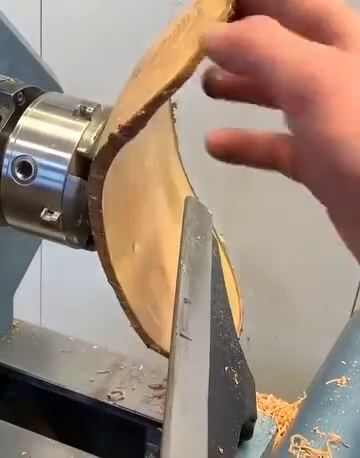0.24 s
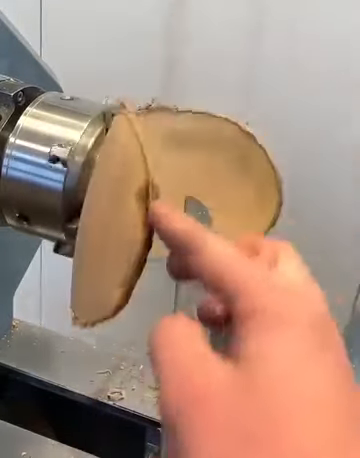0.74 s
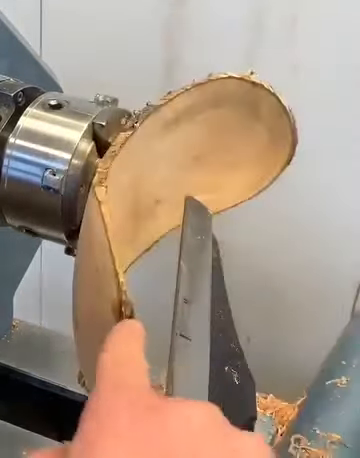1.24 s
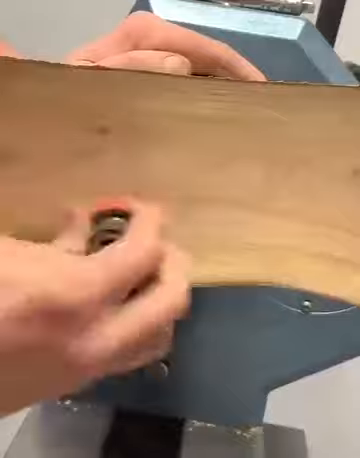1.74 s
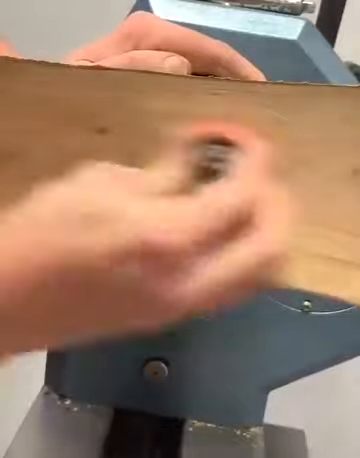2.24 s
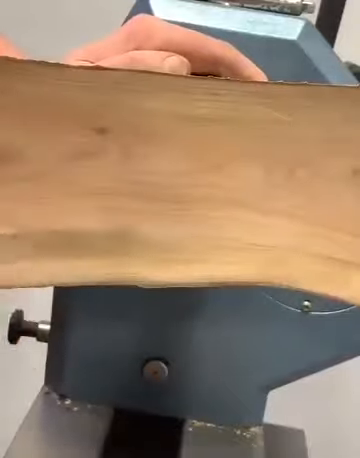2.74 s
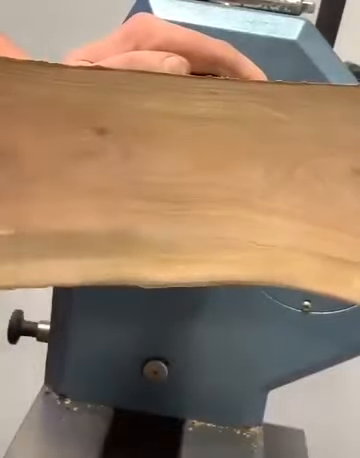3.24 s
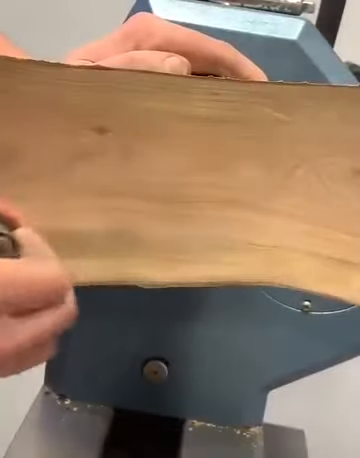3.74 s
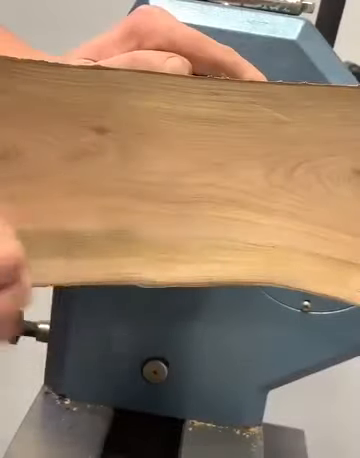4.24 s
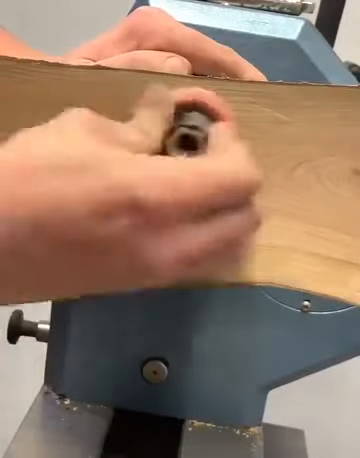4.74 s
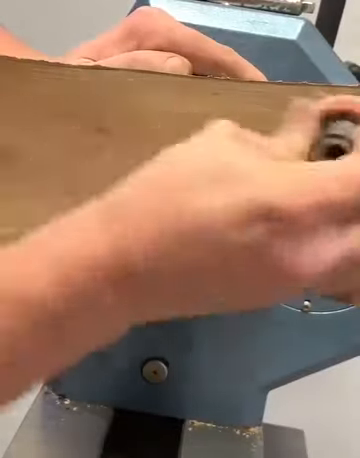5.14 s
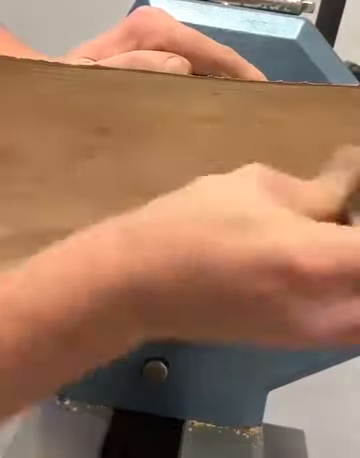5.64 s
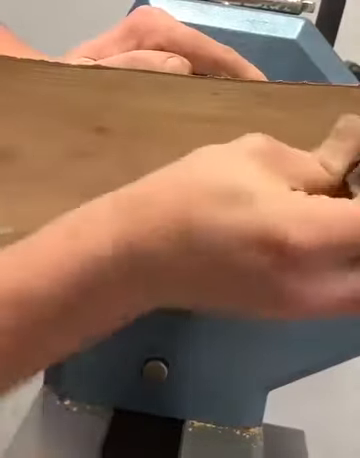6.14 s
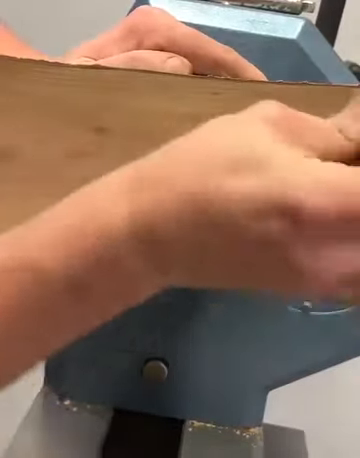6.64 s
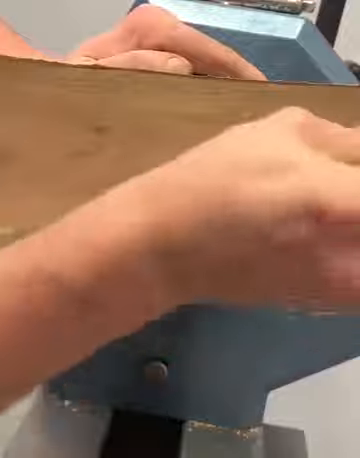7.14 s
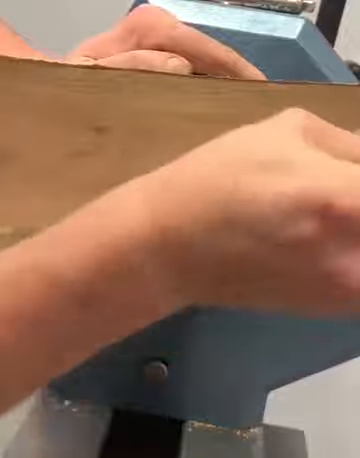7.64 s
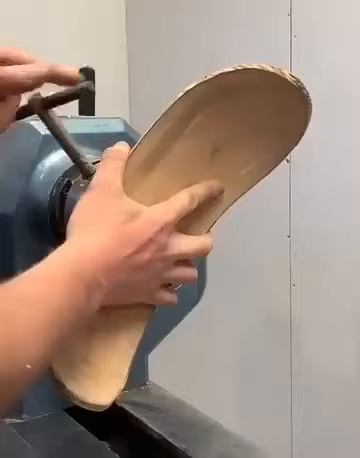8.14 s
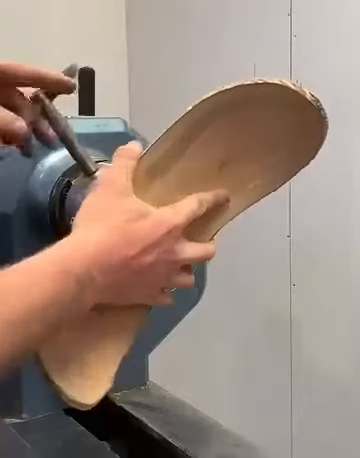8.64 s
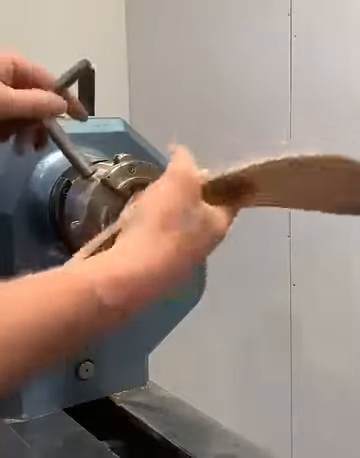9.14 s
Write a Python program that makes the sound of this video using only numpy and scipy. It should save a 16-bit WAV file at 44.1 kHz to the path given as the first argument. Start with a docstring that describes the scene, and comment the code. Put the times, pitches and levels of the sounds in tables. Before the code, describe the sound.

Fast, dry sanding of a hollow wooden piece in a small workshop, scratchy strokes and dull knocks, fading to faint rubs and hand rustle.

```python
"""A hand pad of abrasive is rubbed to and fro over a thin wooden bowl held in a lathe chuck, in a workshop.
Each stroke is grainy noise rasping through the shell's dense resonances, which shift as the pad moves, with a
fine hiss, a hum of the shell and a drone of the lathe bed. The pad lands with soft taps: noise ticks and damped
thuds. The heavy lathe is bumped as the work starts and stops, a damped low swing, and its frame rumbles under
the push as resonant noise. Hands rustle near the end, over a faint background and a short answer from the walls."""
import sys
import numpy as np
from scipy import signal
from scipy.fft import rfft, irfft, next_fast_len
from scipy.io import wavfile
from scipy.ndimage import uniform_filter1d, map_coordinates

SR = 44100
rng = np.random.default_rng(int(sys.argv[2]) if len(sys.argv) > 2 else 0)


def to_wav(sig):
    """Store sig (one row per channel, or 1-D mono) as 16-bit WAV at the path in sys.argv[1].

    Samples outside -1..1 are clipped; the rate is SR.
    """
    pcm = np.clip(np.atleast_2d(sig), -1, 1) * 32767
    pcm = np.round(pcm).astype(np.int16)
    wavfile.write(sys.argv[1], SR, pcm.T)  # frames by channels


N = 414099  # length [samples]
# All levels stand before the slight left-right balance in scene().


def amp(db):
    """The decibel law: level to amplitude ratio."""
    return 10 ** (np.asarray(db) / 20)


def unit(x):
    """Normalisation to a root-mean-square of 1."""
    return x / np.sqrt(np.mean(np.abs(x) ** 2) + 1e-20)


def along(points, hz):
    """Linear interpolation of (frequency, value) points on a logarithmic frequency axis."""
    f, v = np.transpose(points)
    return np.interp(np.log(hz + 1), np.log(f + 1), v)


def curves(rows):
    """Linear interpolation in time: one value per sample for each column after the time."""
    times, *columns = np.transpose(rows)
    return [np.interp(np.arange(N) / SR, times, column) for column in columns]


def wobble(rate):
    """Random modulation: a smooth curve through rate random knots a second."""
    knots = rng.standard_normal(int(N * rate / SR) + 4)
    return map_coordinates(knots, [np.arange(N) * rate / SR])


def filtered(x, response):
    """Linear filtering: the spectrum times a response of frequency."""
    m = next_fast_len(N + SR // 2)
    return irfft(rfft(x, m) * response(np.fft.rfftfreq(m, 1 / SR)), m)[..., :N]


def modes(table):
    """Modal superposition: damped resonances of alternating sign are summed."""
    def response(f):
        total = 0
        for k, (centre, width, db) in enumerate(table):
            resonance = 1j * f * width / (centre * centre - f * f + 1j * f * width)
            total = total + (-1) ** k * amp(db) * resonance
        return total
    return response


# Likeness of the left and right channels: (frequency [Hz], likeness [0-1])
LIKENESS = [(60, 1), (120, 0.91), (240, 0.81), (480, 0.8), (950, 0.47), (1890, 0.76), (3400, 0),
            (8150, 0.05), (8350, 0.03), (9300, 0.9), (10300, 0)]


def side_angle(hz):
    """Interchannel coherence: the angle from middle to side that yields the likeness."""
    return np.arccos(np.clip(along(LIKENESS, hz), 0, 1)) / 2


def spread(gain):
    """Diffuse field: stereo noise of rms 1, its left-right likeness set at each frequency."""
    def split(hz):
        return gain(hz) * [np.cos(side_angle(hz)), np.sin(side_angle(hz))]
    mid, side = filtered(rng.standard_normal((2, N)), split)
    return unit(np.array([mid + side, mid - side]))


# Relative spectrum of the workshop's background: (frequency [Hz], spectral level [dB])
AIR_SPECTRUM = [(59, -45), (100, -8), (267, -1.5), (644, -5.5), (1150, -13), (1980, -9.5), (2320, -16),
                (3610, -15.5), (7880, -25), (12000, -89)]


def background():
    """Stationary broadband noise: a faint hush whose level wavers slightly."""
    return amp(-54.5 + 1.5 * wobble(5.8)) * spread(lambda hz: amp(along(AIR_SPECTRUM, hz)))


def workshop(x):
    """Reverberation: convolution with decaying noise, a short diffuse answer from the walls."""
    t = np.arange(SR // 4) / SR
    tail = rng.standard_normal((2, len(t))) * amp(-60 * t / 0.14)  # t60 of 0.14 s
    return signal.fftconvolve(x, tail / np.linalg.norm(tail[0]), axes=1)[:, :N]


# Rumble of the lathe frame: (time [s], level [dB])
FRAME_RUMBLE = [(0.0, -44.5), (0.63, -67), (1.72, -55), (1.93, -47), (2.22, -53), (2.54, -61), (3.68, -58),
                (4.81, -54), (5.54, -63.5), (5.7, -50.5), (6.2, -48), (6.4, -55), (7.29, -59), (8.32, -55)]
# Resonances of the frame: (centre [Hz], width [Hz], relative level [dB])
FRAME_MODES = [(50, 12, 4), (67, 33, 1)]


def lathe():
    """Forced resonance: noise through the frame's low modes rumbles in lumps."""
    return amp(curves(FRAME_RUMBLE)[0] + 1.1 * wobble(9)) * spread(modes(FRAME_MODES))


# Rustle of hands on the bowl: (time [s], level [dB])
HAND_RUSTLE = [(8.92, -62), (8.99, -44), (9.13, -63), (9.24, -57), (9.28, -52.5), (9.39, -57)]


def handling():
    """Friction noise: hands shift on the loosened bowl with a soft, lumpy rustle."""
    lumps = amp(curves(HAND_RUSTLE)[0] + 3.5 * wobble(45))
    rustle = lumps * spread(lambda hz: modes([(450, 900, 0)])(hz) ** 2)
    return rustle * (np.arange(N) > HAND_RUSTLE[0][0] * SR)


def knocks(table, attack_s, lumpy_db):
    """Impulse response of a damped oscillator: each soft blow is a low swing that dies exponentially."""
    out, t = np.zeros(N + SR), np.arange(SR // 2) / SR
    for s, db, hz, t60 in table:
        decay_db = -60 * t / t60
        overtone = 0.49 * np.sin(2 * np.pi * 1.79 * hz * t) * amp(decay_db)  # dies twice as fast
        swing = np.sin(2 * np.pi * hz * t) + overtone
        out[round(s * SR):][:len(t)] += amp(db + decay_db) * (1 - np.exp(-t / attack_s)) * swing
    return out[:N] * amp(lumpy_db * wobble(40))


# The lathe is bumped: (time [s], level [dB], pitch [Hz], t60 [s])
LATHE_BUMPS = [(0.05, -36, 61, 0.16), (0.399, -43, 64, 0.22), (0.644, -24, 63.8, 0.51),
               (0.727, -27, 55, 0.44), (8.175, -30, 55, 0.21), (8.207, -33, 55.7, .25)]


def bumps():
    """Impact excitation: the heavy lathe swings slowly, its decay made uneven."""
    return knocks(LATHE_BUMPS, attack_s=0.007, lumpy_db=1.0)


# The pad or a hand lands on the bowl: (time [s], thud level [dB], thud pitch [Hz], tick level [dB])
LANDINGS = [(0.03, -37, 276, -60), (0.634, -28, 237, -35), (0.652, -26.5, 121, -33), (1.705, -34, 159, -55),
            (1.96, -35, 260, -48), (2.03, -24, 570, -36), (2.664, -30, 119, -52), (2.684, -22, 161, -39),
            (2.88, -25, 175, -36), (3.166, -31, 179, -38), (3.353, -23, 150, -31.5), (3.544, -55, 121, -39),
            (3.614, -42, 121, -37), (3.666, -34, 133, -43), (4.312, -31, 186, -49),
            (5.613, -29.5, 238, -53), (8.244, -22, 203, -28.5), (8.27, -20.5, 167, -48),
            (8.294, -27, 175, -55)]
THUD_T60_S, THUD_LAG_S = 0.076, 0.0055  # the thud of the whole bowl follows the tick


def thuds():
    """Impact excitation: the whole bowl swings briefly after each landing."""
    blows = [(s + THUD_LAG_S, db, hz, THUD_T60_S) for s, db, hz, _ in LANDINGS]
    return knocks(blows, attack_s=0.0024, lumpy_db=0.0)


# The bowl's lowest modes, which ring and hum: (centre [Hz], width [Hz], relative level [dB])
SHELL_MODES = [(268.6, 8.6, -8), (559.9, 53, 1.5), (1200, 101, -1.5)]


def contacts():
    """Modal excitation: each landing is a short dry tick that also rings the shell's lower modes."""
    ticks, t = np.zeros((2, N + SR)), np.arange(SR // 10) / SR
    for s, *_, tick_db in LANDINGS:
        envelope = amp(tick_db - 60 * t / 0.032) * (1 - np.exp(-t / 0.001))
        ticks[:, round(s * SR):][:, :len(t)] += envelope * rng.standard_normal((2, len(t)))
    ticks = ticks[0, :N] + 1.1 * ticks[:, :N]  # a shared part makes the sides partly alike

    def response(hz):
        ring = amp(22) * modes(SHELL_MODES)(hz) / (1 + 1j * hz / 600) ** 2
        dry_tick = 1 / (1 + 1j * hz / 6000) ** 2
        return ring + dry_tick
    return filtered(ticks, response)


# Spells in which a band of the rasp reaches the two channels in opposite phase (share over 0)
# or in phase (under 0): (start [s], length [s], share [-1 to 1], centre at start [Hz],
# centre at end [Hz], half-width [log ratio])
PHASE_SPELLS = [(0.665, 0.39, 0.93, 3620, 2650, 0.15), (3.7, 1.2, -0.59, 2200, 2420, 0.23),
                (3.7, 1.4, -.8, 9700, 9700, .07), (5.1, 0.31, 0.86, 2500, 3150, .13),
                (5.2, 0.18, 0.99, 3400, 4150, 0.098), (5.56, 0.16, 0.99, 2670, 2930, 0.23),
                (5.88, 0.17, 0.88, 3000, 2500, 0.16), (6.07, 0.18, 0.97, 3050, 2750, 0.11),
                (6.2, .2, .97, 3380, 3530, 0.056), (6.19, 2.1, 0.37, 1870, 2480, 0.36),
                (8.42, .5, -0.88, 2150, 2400, 0.18)]
SPELL_FADE_S = 0.027


def sideways(hz, t):
    """Band-wise phase control: how far each frequency is driven into opposite phase, and how far into phase."""
    share = np.zeros((2, len(hz), len(t)))
    for s, length, part, from_hz, to_hz, width in PHASE_SPELLS:
        inside = np.clip(1 + np.minimum(t - s, s + length - t) / SPELL_FADE_S, 0, 1)
        centre_hz = np.interp(t, [s, s + length], [from_hz, to_hz])
        band = np.exp(-np.abs(np.log((hz[:, None] + 1) / centre_hz) / width) ** 4)
        signed = np.clip([part, -part], 0, 1)[:, None, None]
        share = np.maximum(share, signed * inside * band)
    return share


def through_shell(pair, width_hz, hold_s, steady):
    """Multipath transmission: narrow peaks and holes move as the contact point moves."""
    frame, overlap = 1024, 768  # samples
    hz, t, z = signal.stft(pair, SR, nperseg=frame, noverlap=overlap)
    knots = rng.standard_normal((4, 600, 300))
    grid = np.meshgrid(hz / width_hz, t / hold_s, indexing="ij")
    a, b, c, d = [map_coordinates(k, grid, order=1, mode="wrap") for k in knots]
    # a band in opposite phase swings from middle to side, a band in phase the other way
    turn = side_angle(hz)[:, None]
    opposed, together = sideways(hz, t)
    turn = turn * (1 - together) + (np.pi / 2 - turn) * opposed
    # broad bands swell and fade by themselves
    broad_grid = np.meshgrid(hz / 1800, t / .05, indexing="ij")
    patch = map_coordinates(knots[0].T, broad_grid, order=1, mode="wrap")
    z = z * amp(1.9 * patch)
    mid = np.cos(turn) * unit(steady + unit(a + 1j * b)) * z[0]
    side = np.sin(turn) * unit(c + 1j * d) * (0.58 * z[0] + 0.75 * z[1])
    both = np.array([mid + side, mid - side])
    return signal.istft(both, SR, nperseg=frame, noverlap=overlap)[1][:, :N]


def grit(spiky_db, scratchy_db):
    """Stochastic friction: countless grains tear fibres, noise varying from grain to grain and scratch to scratch."""
    size_db = spiky_db * wobble(1500) + scratchy_db * wobble(220)
    return unit(rng.standard_normal((2, N)) * amp(size_db))


# Strokes of the pad, the shortest being catches: (start [s], length [s], rasp level at start [dB],
# rasp level at end [dB], t60 of the lift-off [s], fine hiss over the rasp [dB]), before swell and arch
PAD_STROKES = [(0.328, 0.11, -61.5, -46.5, 0.45, -0.5), (0.518, 0.1, -47.5, -38.5, 0.31, -4),
               (0.667, 0.052, -31, -37.5, 0.11, -15), (0.739, 0.087, -34, -55, 0.028, -1),
               (0.807, 0.27, -37, -35, 0.19, -1), (1.08, 0.099, -46.5, -32.5, 0.37, 2),
               (1.218, 0.1, -37.5, -30.5, 0.069, -1.5), (1.335, 0.048, -38.5, -27.5, 0.15, -2.5),
               (1.437, 0.025, -41, -28.5, 0.15, -5), (1.485, 0.21, -39, -26.5, 0.055, -2.5),
               (1.718, 0.11, -27, -30.5, 0.37, -0.5), (1.844, 0.059, -43.5, -19, 0.1, -7),
               (1.942, 0.068, -26.5, -34.5, 0.012, -4), (1.999, 0.047, -35.5, -27.5, 0.011, -2.5),
               (2.041, 0.15, -28.5, -33, 0.028, -7), (2.185, 0.066, -25.5, -29.5, 0.049, -1),
               (2.259, 0.19, -29, -30.5, 0.5, 2.5), (2.487, 0.068, -17, -23, 0.022, -18),
               (2.565, 0.055, -24.5, -48.5, 0.037, -16), (2.586, 0.018, -33.5, -18.5, 0.067, -6),
               (2.71, 0.084, -23.5, -22, 0.12, -14.5), (2.886, 0.084, -28, -17.5, 0.056, -8.5),
               (3.046, 0.062, -21, -25.5, 0.051, -9), (3.171, 0.096, -35, -23, 0.1, 0.5),
               (3.267, 0.062, -56, -40, 0.048, -25), (3.386, 0.05, -28, -23.5, 0.2, -3),
               (3.565, 0.053, -78, -47, 0.14, -4), (3.686, 0.23, -23, -24, 0.089, -8.5),
               (3.991, 0.037, -24, -23, 0.1, -2.5), (4.03, 0.027, -33, -16.5, 0.044, -13),
               (4.078, 0.023, -25, -42, 0.046, -12), (4.095, 0.058, -26, -20.5, 0.13, -7.5),
               (4.172, 0.088, -27.5, -17.5, 0.076, -3), (4.315, 0.078, -22.5, -35.5, 0.018, 2),
               (4.378, 0.089, -25, -30, 0.062, -10), (4.478, 0.054, -20.5, -16, 0.34, -5),
               (4.556, 0.065, -32.5, -20, 0.071, -2), (4.678, 0.076, -25, -27.5, 0.25, -3.5),
               (4.789, 0.12, -31.5, -29, 0.13, -2), (4.953, 0.19, -33.5, -25, 0.34, -0.5),
               (5.214, 0.17, -41.5, -33, 0.16, 2.5), (5.44, 0.14, -30, -24.5, 0.082, -4),
               (5.603, 0.16, -33.5, -29.5, 0.12, -3), (5.811, 0.15, -27.5, -26, 0.13, -3.5),
               (5.993, 0.14, -33, -36, 0.18, -7.5), (6.18, 0.11, -28, -23.5, 0.058, -13),
               (6.319, 0.11, -24.5, -29, 0.158, -9), (6.474, 0.086, -25.5, -26.5, 0.066, -8),
               (6.585, 0.098, -21.5, -30, 0.13, -7), (6.712, 0.099, -34.5, -24, 0.054, -8.5),
               (6.837, 0.11, -25.5, -30.5, 0.064, -6), (6.978, 0.1, -29, -30, 0.053, -6.5),
               (7.099, 0.1, -25, -30, 0.11, -8), (7.222, 0.097, -40, -29, 0.11, -7.5),
               (7.349, 0.11, -28.5, -29.5, 0.19, -7.5), (7.503, 0.071, -29, -70, 0.019, -9),
               (7.55, 0.036, -28.5, -32.5, 0.012, -9), (7.596, 0.12, -25, -26.5, 0.076, -8.5),
               (7.724, 0.04, -48, -30, 0.16, -8.5), (7.798, 0.026, -38.5, -21, 0.06, -21),
               (7.87, 0.12, -22, -29.5, 0.11, -8), (7.999, 0.052, -38.5, -35.5, 0.13, -4),
               (8.076, 0.16, -52, -61, 0.036, -39), (8.249, 0.0046, -36, -44.5, 0.49, -36),
               (8.324, 0.1, -45, -38.5, 0.16, -10.5), (8.486, 0.11, -36, -37, 0.092, -8.5),
               (8.632, 0.099, -43.5, -33, 0.11, -7.5), (8.773, 0.094, -46.5, -43, 0.074, -2.5),
               (8.899, 0.098, -52.5, -52, 0.062, -8), (9.027, 0.052, -49, -57, 1, -31),
               (9.262, 0.048, -52, -51, 0.22, -16)]
# The grit snags sharply: (time [s], rasp level [dB])
GRIT_SNAGS = [(1.446, -37), (2.178, -24), (2.703, -34), (3.167, -38.5), (3.667, -35), (3.985, -25),
              (4.402, -23.5), (5.432, -37), (5.814, -32.5), (6.176, -25.5), (6.322, -22), (6.48, -29),
              (6.840, -29), (7.558, -21.5), (7.81, -32), (7.864, -27), (9.256, -47), (9.271, -49)]
LAND_S, SNAG_T60_S = 0.057, 0.06  # 60 dB of rise before a stroke; 60 dB of decay after a snag
REST_DB = -74  # a hand resting on the wood
SWELL_DB, SWELL_S, ARCH_DB = 5.5, 0.0081, 1.92  # a stroke starts this much low and swells; its middle stands out


def pressure():
    """Amplitude envelope: strokes land, swell, drift in level and die on lift-off; returns push and hiss share."""
    push, hiss = np.full(N, amp(REST_DB)), np.full(N, amp(REST_DB - 36))
    t = np.arange(N) / SR
    for s, length, from_db, to_db, t60, fine_db in PAD_STROKES:
        near = slice(max(round((s - .2) * SR), 0), round((s + length + .6) * SR))
        u = t[near] - s
        progress = np.clip(u / length, 0, 1)
        held_db = from_db + (to_db - from_db) * progress + ARCH_DB * np.sin(np.pi * progress)
        landing_db = 60 * np.minimum(u, 0) / LAND_S
        swell_db = -SWELL_DB * np.exp(-np.maximum(u, 0) / SWELL_S)
        lift_db = -60 * np.maximum(u - length, 0) / t60
        stroke_db = held_db + landing_db + swell_db + lift_db
        push[near] += amp(stroke_db)
        hiss[near] += amp(stroke_db + fine_db)
    share = hiss / push
    u = t[:SR // 5]
    for s, db in GRIT_SNAGS:
        snag = amp(db - 60 * u / SNAG_T60_S) * (1 - np.exp(-u / 0.00078))
        push[round(s * SR):][:len(u)] += snag[:N - round(s * SR)]
    return uniform_filter1d(push, size=60) * amp(0.34 * wobble(60)), share


# Where the pad works on the bowl sets the colour, each level relative to the rasp:
# (time [s], dull scrape level [dB], shell hum level [dB], bed drone level [dB])
COLOUR = [(0.0, 21, -12, 6), (0.6, -9, -20, -15.5), (1.65, -17.5, -22.5, -29.5), (2.0, -10.5, -29, -13.5),
          (2.3, -13.5, -20, -27.5), (3.3, -16.5, -23.5, -15.5), (3.85, -12, -16.5, -21),
          (4.6, -16.5, -22, -24), (4.85, -19.5, -24, -39), (5.16, -11, -12, -45), (5.39, -19, -19, -34),
          (5.7, -22, -15.5, -20.5), (6.6, -11, -12, -24.5), (7.3, -12, -10.5, -29),
          (7.9, -16, -13.5, -28.5), (8.17, 6, -17, 3), (8.29, 0.5, -4, -9), (8.65, -15.5, -23.5, -25),
          (9.39, -30, -13, -19)]
# Gain of the hiss above about 11.5 kHz: (time [s], gain [dB])
TOP_HISS = [(0.0, 2), (4.4, -2.5), (5.3, 3), (6.4, 0.5)]
# Relative spectra of rasp, fine hiss and bed drone: (frequency [Hz], spectral level [dB])
RASP_SPECTRUM = [(820, -56), (1400, -9), (2700, 1.5), (4500, 0.5), (5750, -2), (7840, -7.5), (8200, -24.5),
                 (10700, -22.5), (18000, -120)]
HISS_SPECTRUM = [(4850, -18.5), (8250, -3.5), (8550, -14), (10200, -10.5), (14200, -14), (15900, -19.5)]
BED_SPECTRUM = [(59, -46), (100, -14.5), (151, -8), (237, -8), (274, -2.5), (450, -8.5), (580, -5),
                (990, -120)]


def sanding():
    """Source and filter: each stroke drives the rasp, fine hiss, shell hum and drone of the lathe bed."""
    dull_db, hum_db, drone_db = curves(COLOUR)
    push, hiss_share = pressure()
    grains = grit(spiky_db=1.13, scratchy_db=1.37)
    rasp = unit(filtered(grains, lambda hz: amp(along(RASP_SPECTRUM, hz))))
    dull = unit(filtered(grit(spiky_db=2.5, scratchy_db=2.2), modes([(1190, 720, 0)])))
    fine = unit(filtered(grains, lambda hz: amp(along(HISS_SPECTRUM, hz))))
    top = filtered(fine, lambda hz: 1 / (1 + (11500 / (hz + 1)) ** 10))
    fine = fine + (amp(curves(TOP_HISS)[0]) - 1) * top

    # a strong stroke is brighter; a light one loses the dull scrape
    swing = push / uniform_filter1d(push, SR // 3)
    fine = fine * swing ** 0.25
    dull = amp(dull_db) * dull * np.minimum(swing, 1) ** 0.37
    sharp = push * through_shell(rasp + dull + hiss_share * fine, width_hz=55, hold_s=.16, steady=0.3)

    hum_level = uniform_filter1d(push, 500) * amp(hum_db + 4.4 * wobble(25))
    hum = hum_level * spread(lambda hz: modes(SHELL_MODES)(hz) ** 1.41)  # the power sharpens the modes
    # the bed follows the stroke only loosely
    soft = np.minimum(uniform_filter1d(swing, 1200), 1.6) ** 0.8 * uniform_filter1d(push, SR // 5)
    drone = amp(drone_db + 3.3 * wobble(30)) * spread(lambda hz: amp(along(BED_SPECTRUM, hz)))
    return sharp + hum + soft * drone


def scene():
    """Superposition: near sounds, their answer from the walls, and the layers that get no echo."""
    near = sanding() + contacts() + thuds() + bumps()
    echo = amp(-18.5) * workshop(near.mean(axis=0, keepdims=True))
    total = near + echo + lathe() + handling() + background()
    return total * amp([[.15], [-.15]])  # balance [dB]: the left slightly louder


def record(dry):
    """Band limitation: nothing is kept from 15950 Hz upward."""
    return filtered(dry, lambda hz: hz < 15950)


dry = scene()
out = record(dry)
to_wav(out)
```